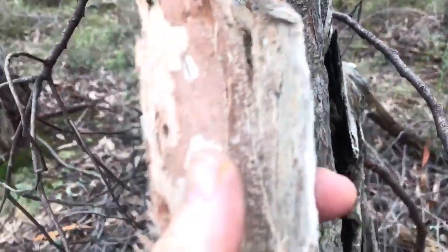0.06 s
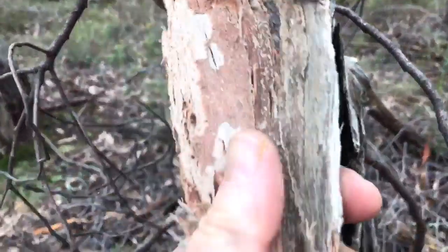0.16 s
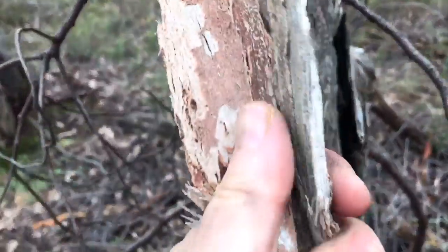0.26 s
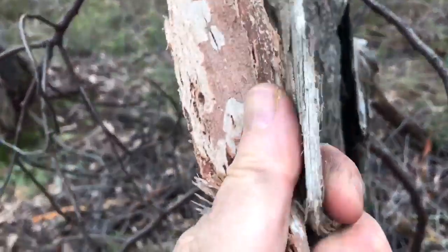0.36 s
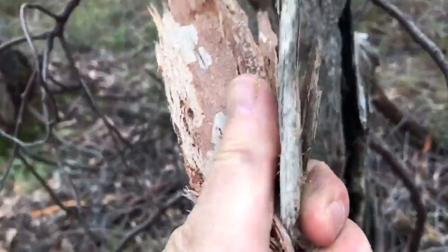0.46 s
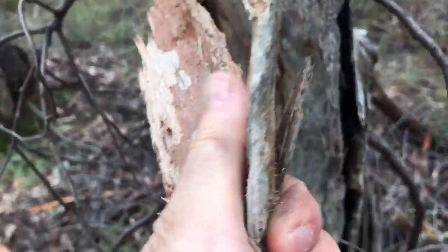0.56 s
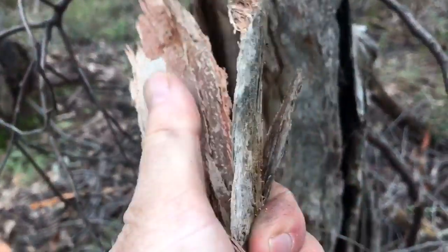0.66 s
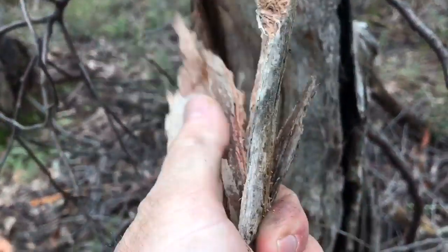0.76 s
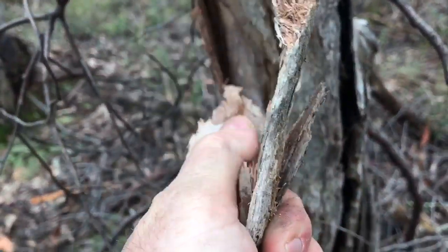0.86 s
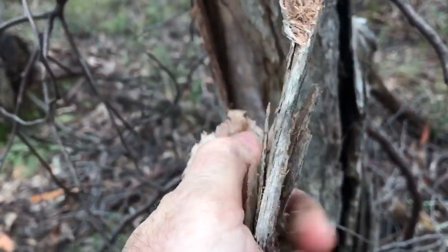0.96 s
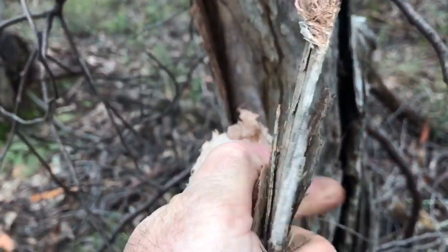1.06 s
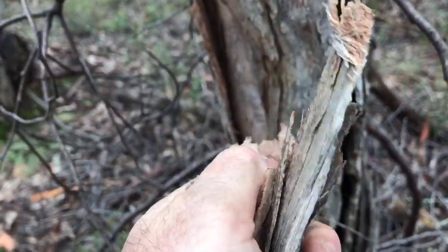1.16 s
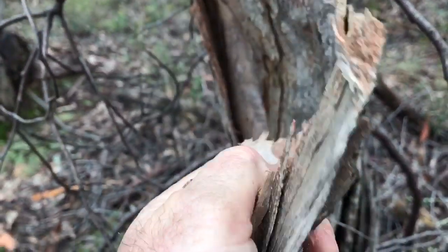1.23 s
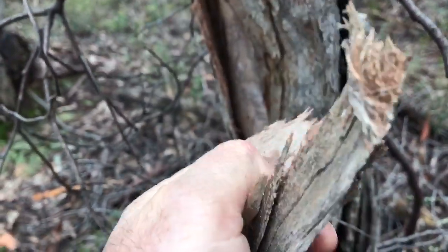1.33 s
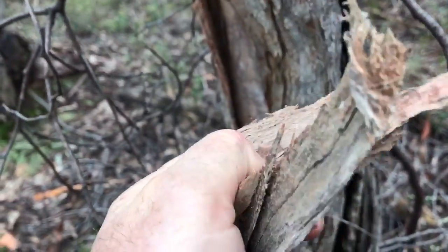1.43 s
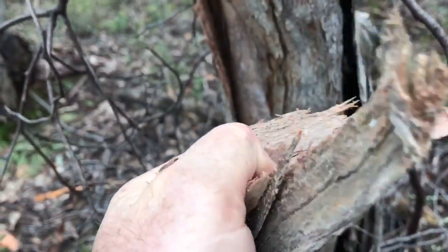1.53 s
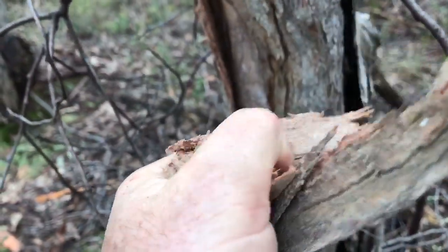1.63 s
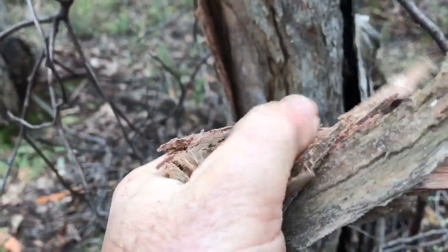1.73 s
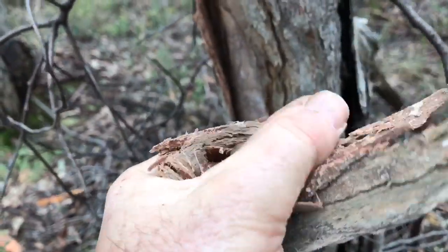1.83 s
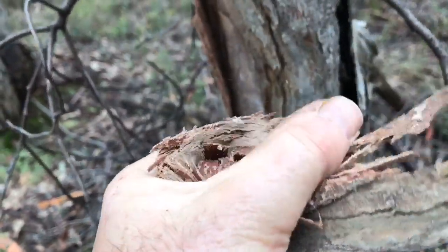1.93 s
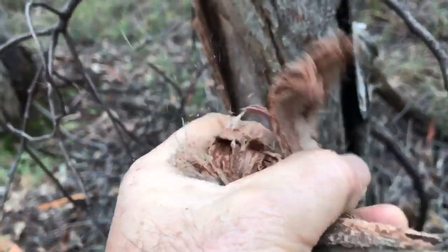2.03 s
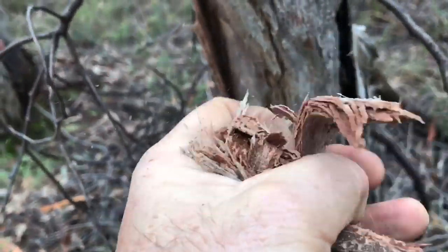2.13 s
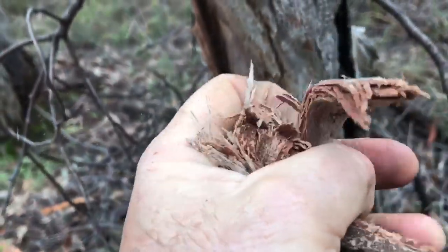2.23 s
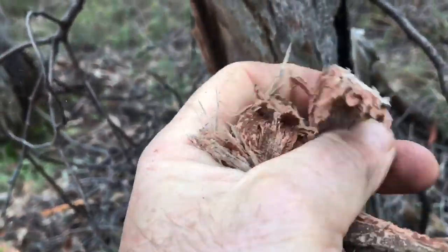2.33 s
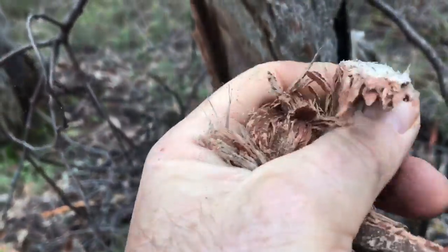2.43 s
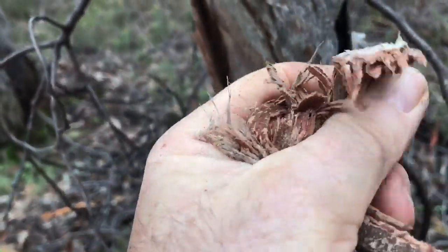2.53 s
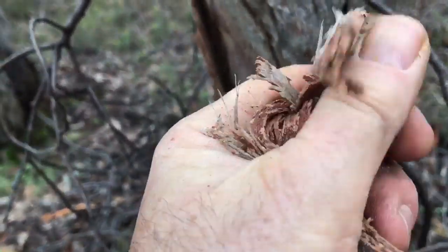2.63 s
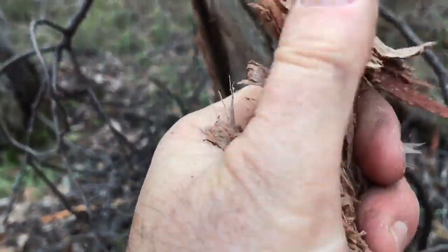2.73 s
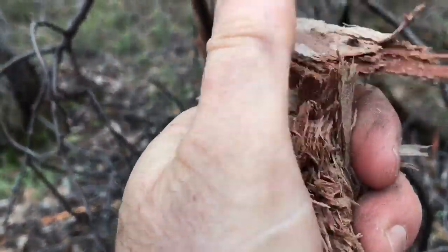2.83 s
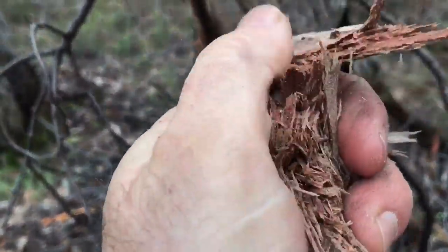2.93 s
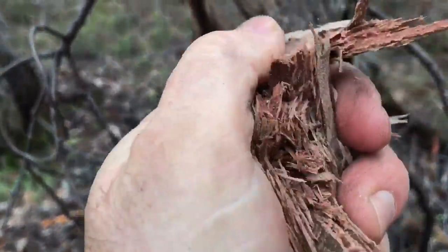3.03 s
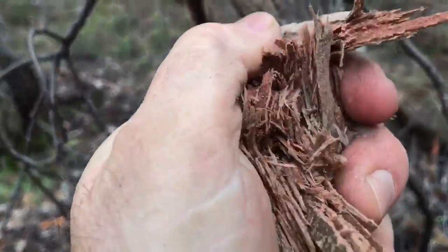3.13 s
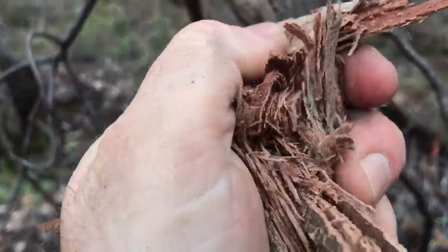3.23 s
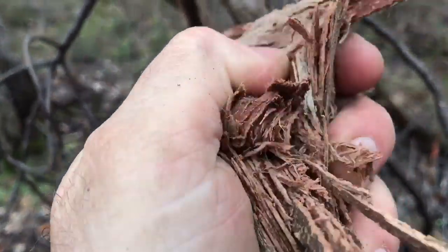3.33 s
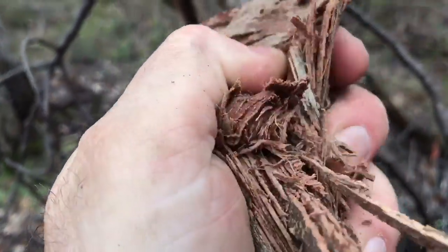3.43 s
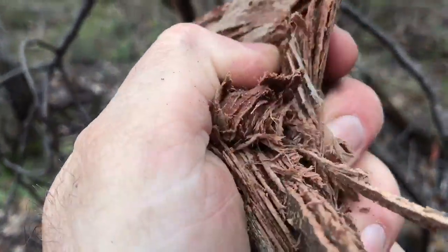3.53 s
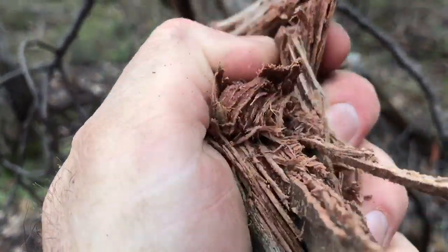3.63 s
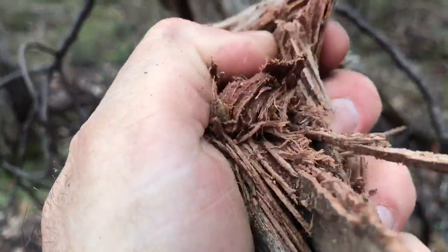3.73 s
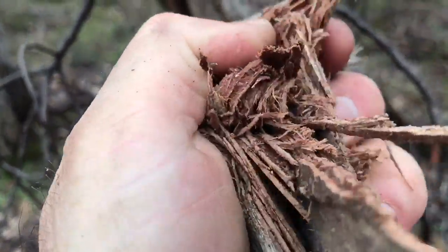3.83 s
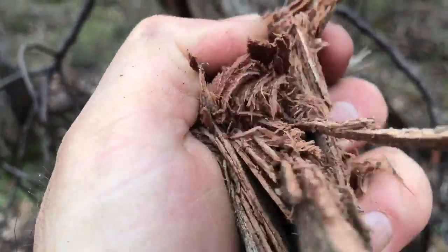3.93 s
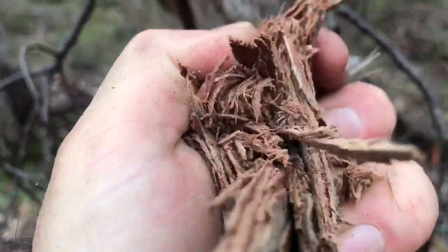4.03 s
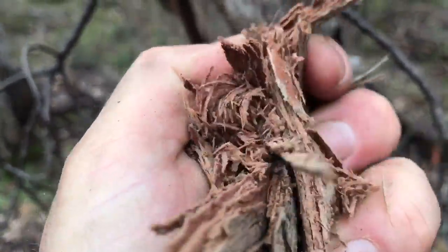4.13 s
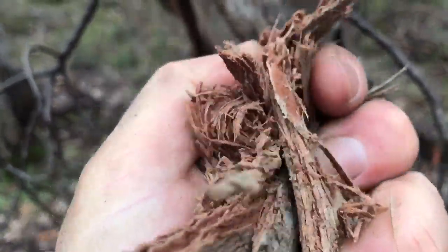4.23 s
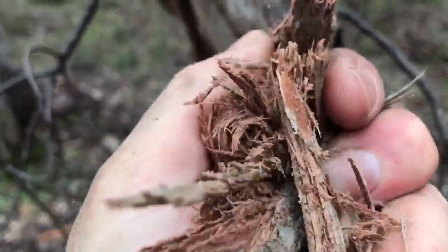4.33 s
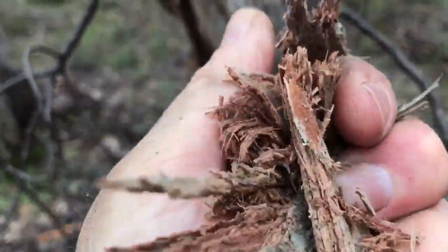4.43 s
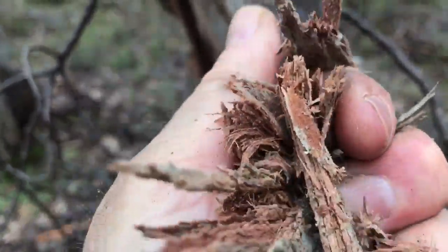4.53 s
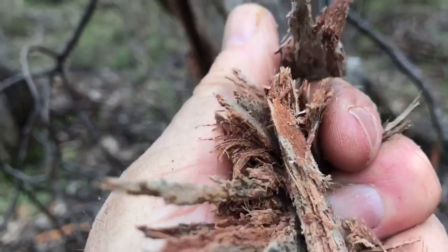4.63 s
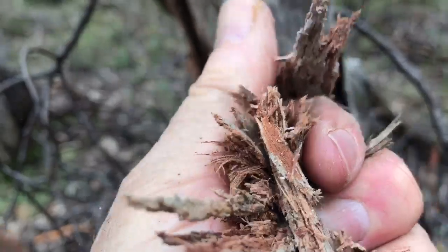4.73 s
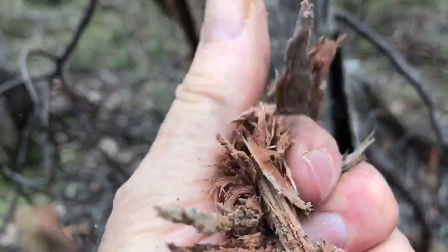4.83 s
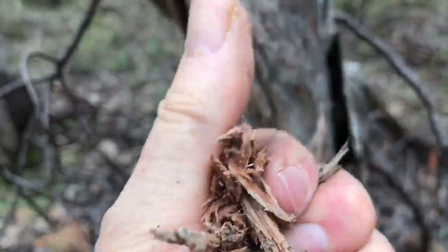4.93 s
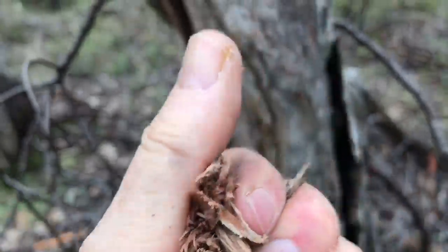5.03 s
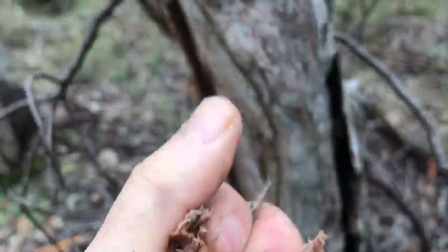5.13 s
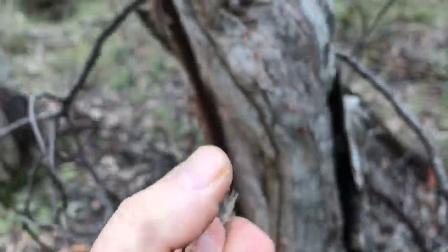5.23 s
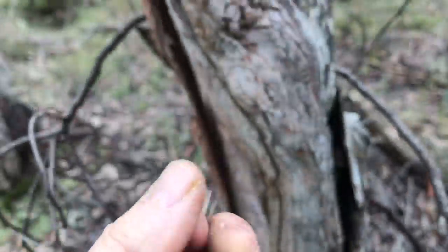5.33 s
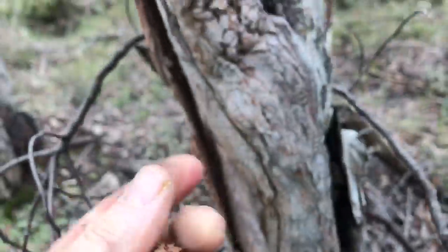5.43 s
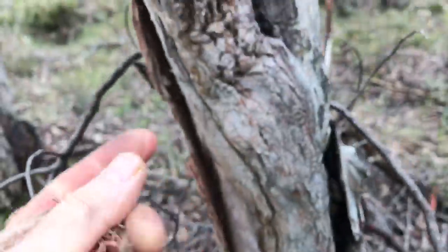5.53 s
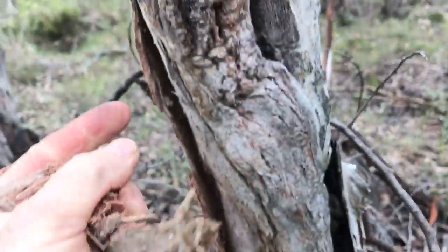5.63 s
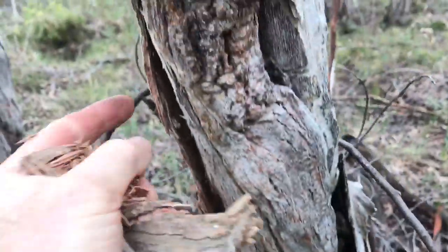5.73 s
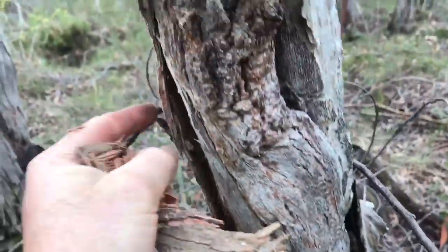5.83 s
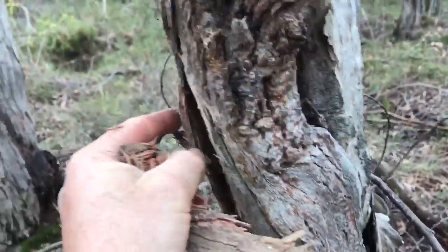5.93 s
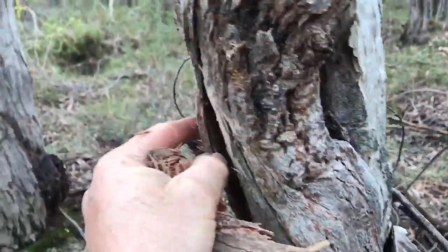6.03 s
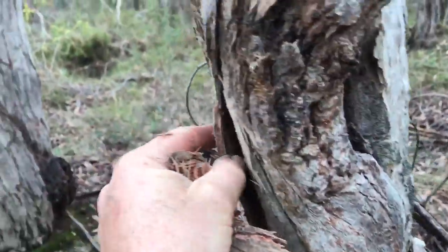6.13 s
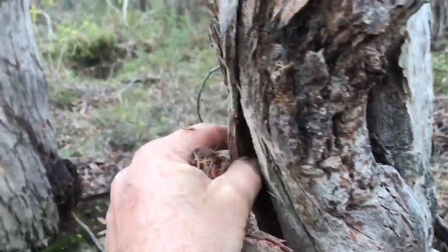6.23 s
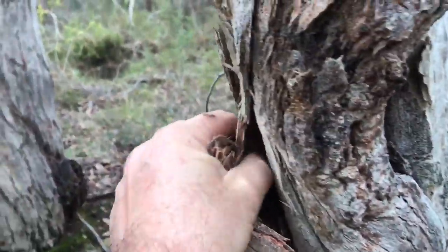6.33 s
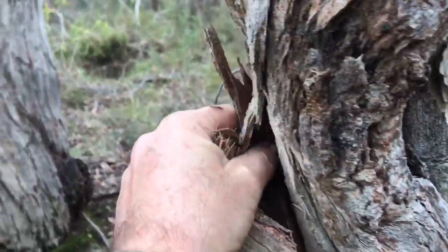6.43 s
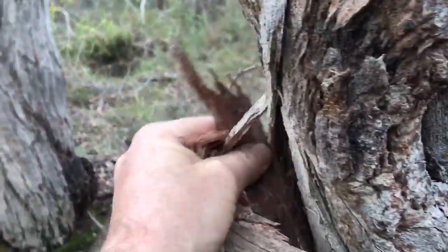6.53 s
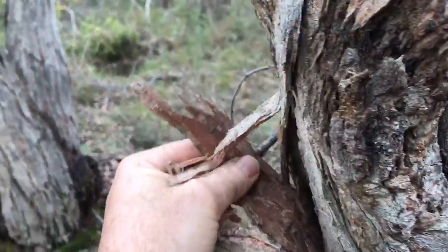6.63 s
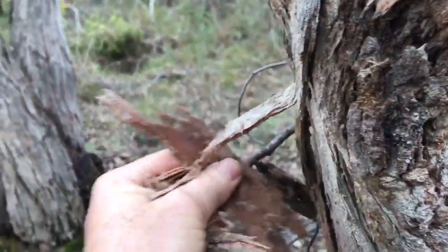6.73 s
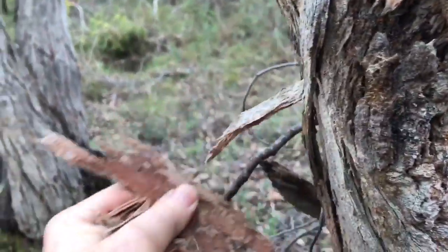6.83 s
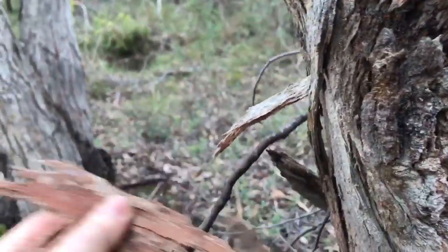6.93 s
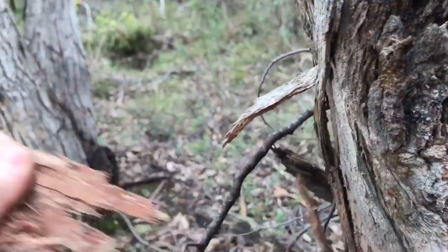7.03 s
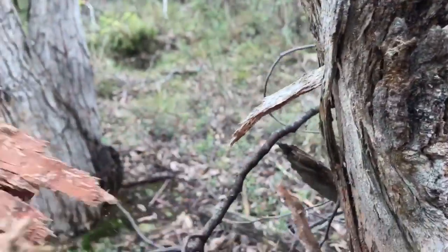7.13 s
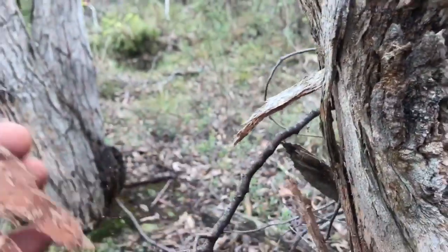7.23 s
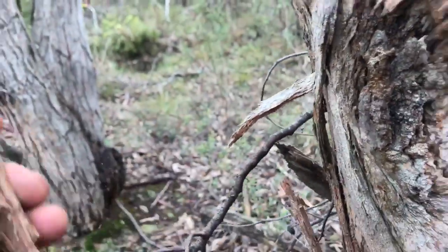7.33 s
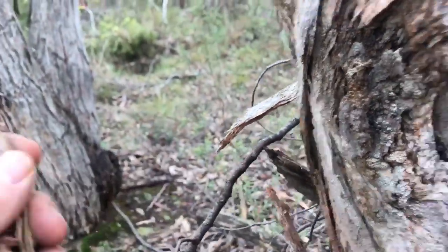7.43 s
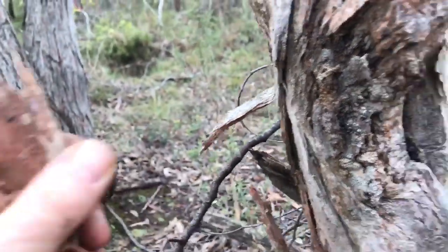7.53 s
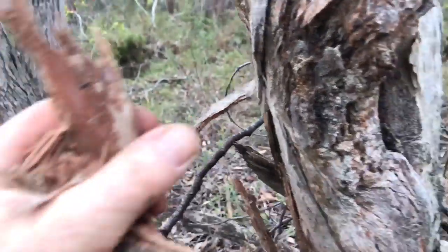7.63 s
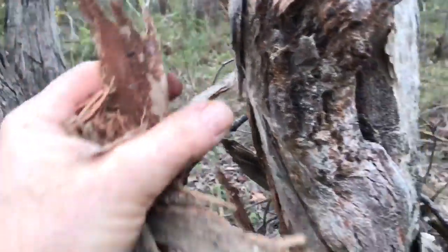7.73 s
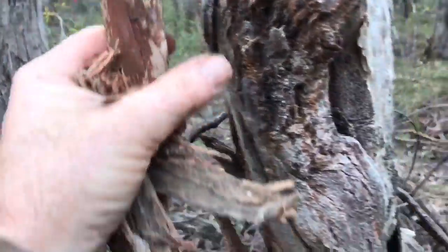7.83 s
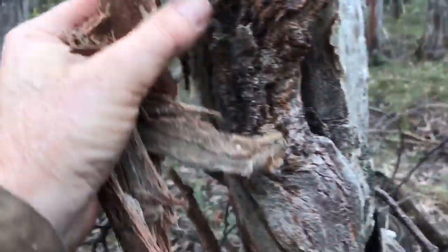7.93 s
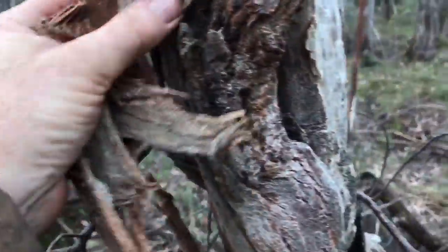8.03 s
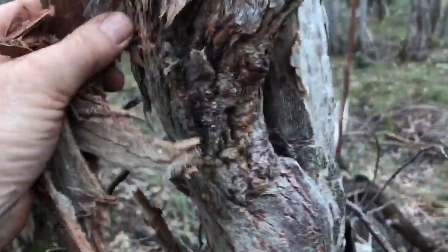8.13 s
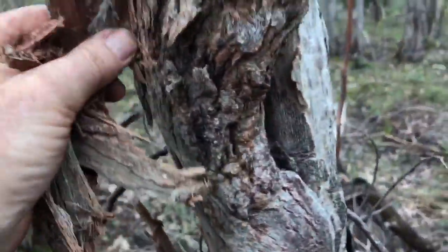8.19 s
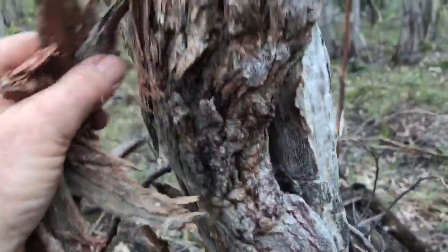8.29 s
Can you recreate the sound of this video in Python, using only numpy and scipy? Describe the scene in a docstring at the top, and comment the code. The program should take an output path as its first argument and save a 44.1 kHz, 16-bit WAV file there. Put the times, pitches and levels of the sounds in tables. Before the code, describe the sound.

Dry fibrous bark crackles, crunches and rips close up in a gripping hand, with sharp splinter snaps, then sparser tugs and dull woody bumps.

```python
"""Stripping dry bark

Quiet bushland, mono microphone close to a hand that bends, crushes and strips fibrous bark from a dead trunk.
Fibres break by the thousand: short bursts of filtered noise that follow the grip and flare with every tear.
Thicker splinters snap one by one, each a noisy crack with a falling ring; loose slabs give dull low bumps.
Far off, a rumble and a faint hiss of air are steady noise that wavers a little."""
import sys
import numpy as np
from scipy import signal
from scipy.io import wavfile

SR = 44100
rng = np.random.default_rng(int(sys.argv[2]) if len(sys.argv) > 2 else 0)


def inscribe(sig):
    """Save sig as 16-bit PCM at rate SR to the path in sys.argv[1].

    A 1-D sig is mono; a 2-D sig holds one channel per row.
    Samples are clipped to [-1, 1] before scaling.
    """
    pcm = np.round(np.clip(np.atleast_2d(sig).T, -1, 1) * 32767)
    wavfile.write(sys.argv[1], SR, pcm.astype(np.int16))


N = 368676      # samples

# The steady grip between tears:
# (time [s], crackle drive [dB], extra low body [dB], extra fine treble [dB])
STEADY_GRIP = [(0, -35.5, 0.5, 0), (0.74, -37, 1, -1), (0.785, -50.5, 26, -1), (0.98, -55, -12, 0),
               (1.3, -42.5, -8, -0.5), (1.7, -42.5, 4, -1.5), (2.0, -46.5, 4, 1.5), (2.3, -46.5, -6, 1),
               (2.6, -43.5, -5, 4), (2.85, -39.5, -8, -2), (2.95, -49.5, -5, 4.5), (3.14, -48.5, -15, 3.5),
               (3.3, -40.5, 10, 1), (3.5, -46.5, 8, 1), (4.1, -47.5, 6, -1.5), (4.45, -40.5, -10, -2),
               (4.7, -45.5, -6, 4), (4.95, -39, 6, -1), (5.5, -43.5, 4, 0), (5.76, -56, 24, -2),
               (6.25, -61, 26, 1), (6.6, -61, 0, -1), (6.75, -45, 1, 2), (6.88, -56.5, 17, -0.5),
               (7.5, -50, 21, -0.5), (7.9, -59, 1, -6.5), (8.36, -51.5, -3, 4.5)]
# Tears, each a flare of the crackle:
# (peak time [s], peak drive [dB], rise [s], fall [s], extra low body [dB])
TEAR_FLARES = [(0.07, -23, 0.058, 0.044, 2), (0.359, -31.5, 0.2, 0.033, 7), (0.499, -34, .05, 0.18, 13),
               (0.7, -33, 0.052, 0.039, 12), (0.873, -34, 0.058, 0.056, -6), (1.04, -40, 0.033, 0.062, 13),
               (1.192, -30, 0.088, 0.068, 2.5), (1.503, -30, 0.16, 0.038, -5),
               (1.589, -25, 0.015, 0.018, -1), (1.734, -29.5, 0.016, 0.04, 5.5),
               (1.87, -33.5, 0.15, 0.095, -2), (2.098, -27.5, .055, 0.076, 2),
               (2.285, -39, 0.052, 0.019, -11), (2.405, -37.5, .09, 0.53, 0),
               (2.759, -29.5, 0.093, 0.05, -13), (2.868, -35.5, 0.054, .05, 13),
               (3.083, -45, 0.034, 0.039, -12), (3.173, -35.5, 0.027, .08, -1), (3.273, -34, .07, 0.025, 0),
               (3.337, -34.5, 0.042, 0.067, 7), (3.394, -27.5, 0.024, 0.047, 3.5),
               (3.717, -39.5, 0.17, 0.067, 1.5), (3.891, -32, 0.078, 0.055, 6.5),
               (4.345, -38.5, 0.19, 0.088, 11), (4.595, -37, 0.29, 0.05, 0),
               (5.123, -43.5, 0.24, 0.035, 25), (5.288, -39.5, 0.064, 0.033, -5),
               (5.378, -35, 0.042, .045, 5), (6.04, -48.5, 0.027, 0.2, 21.5),
               (6.475, -39, 0.16, 0.056, 21.5), (6.581, -35.5, 0.038, 0.32, 16),
               (6.77, -39, 0.02, 0.073, 19), (6.992, -27.5, 0.041, 0.016, 2), (7.195, -41.5, 0.18, .035, 9),
               (7.259, -35.5, 0.0089, 0.0073, 4), (7.363, -35.5, 0.022, 0.038, 2),
               (7.518, -34.5, 0.041, 0.018, -5), (7.842, -53, 0.038, 0.038, 4),
               (8.066, -40, 0.014, 0.035, 24), (8.213, -23, 0.026, 0.016, 11),
               (8.36, -41.5, 0.033, .05, 29)]
TEAR_SPAN_DB = 10       # change of drive over one rise or one fall


def pull():
    """Grip and tears add in power; each brings its own low body in proportion."""
    grip_db, grip_body_db, fine_db = in_time(STEADY_GRIP)
    t = np.arange(N) / SR
    power = from_db(2 * grip_db)        # twice the decibels as gain is power
    weighted_body = power * grip_body_db
    for peak_s, peak_db, rise_s, fall_s, tear_body_db in TEAR_FLARES:
        away = np.where(t < peak_s, (peak_s - t) / rise_s, (t - peak_s) / fall_s)
        flare = from_db(2 * (peak_db - TEAR_SPAN_DB * away))
        power = power + flare
        weighted_body = weighted_body + flare * tear_body_db
    return 10 * np.log10(power), weighted_body / power, fine_db


BREAKS_PER_S = 1000     # before the pull and the clumping change it
SIZE_SPREAD_DB, BREAK_T60_S = 6, 0.0025


def breaks(rush, clump_db):
    """Energy of fibres that part at random, in clumps: bursts of a few milliseconds over a fine rustle; mean 1."""
    born = rng.random(N) < BREAKS_PER_S * rush * from_db(clump_db) / SR
    size_db = SIZE_SPREAD_DB * np.minimum(rng.exponential(1, N), 3.0)
    energy = born * from_db(size_db) ** 2 / rush
    fade = from_db(-120 / (BREAK_T60_S * SR))       # an energy ratio, so 120 here is a 60 dB fall
    bursts = signal.lfilter([1], [1, -fade], energy + 0.062)
    return bursts / bursts.mean()


# Colour of breaking fibre heard up close: (frequency [Hz], level [dB per Hz])
FIBRE_COLOUR = [(180, -12), (350, -16), (700, -10), (1200, -5), (2000, -5), (3200, -1), (4400, -3),
                (6200, -3), (9000, -4.5), (13000, -6.5), (17000, -9)]


def crackle(crackle_db, body_db, fine_db):
    """Most breaks sound in all bands; coarse, middling and fine fibres add breaks of their own range."""
    rush = from_db(0.6 * (crackle_db + 42))     # a harder pull parts more fibres a second
    clump_db = 3.6 * drift(30.0)
    broad = breaks(rush, clump_db)
    white = rng.standard_normal((2, N))         # neighbouring bands get unrelated noise
    coarse, middling, fine = [np.sqrt(broad + 0.55 * breaks(rush, clump_db)) * white for _ in range(3)]
    out = np.zeros(N)
    for k, (hz, band) in enumerate(half_octaves(155)):
        fibres = fine if hz > 7000 else middling if hz > 2000 else coarse
        body_share = np.clip(np.log2(2800 / hz) / 3.4, 0, 1)
        fine_share = np.clip(np.log2(hz / 6000), 0, 1)
        colour_db = at_hz(FIBRE_COLOUR, hz) + body_share * body_db + fine_share * fine_db
        out += from_db(colour_db) * signal.sosfilt(band, fibres[k % 2])
    return from_db(crackle_db) * out


# Splinters that stand out, loud ones and quieter ones heard alone, with some low woody knocks:
# (time [s], drive before the ring's strength scales it [dB],
# nominal ring [Hz], power share of broad crack [0-1], crack centre [Hz], decay scale [s])
DISTINCT_SPLINTERS = [(0.0341, -18.5, 1850, 0.3, 5400, 0.006), (0.045, -18.5, 3010, 0.4, 5200, 0.012),
                      (0.052, -25, 2950, .8, 7500, .0083), (0.068, -14, 3270, 0.3, 5600, 0.0086),
                      (0.0727, -10.5, 3280, .5, 4500, 0.0065), (0.0839, -14.5, 1830, 0.53, 7700, 0.0083),
                      (0.0933, -15, 2670, .5, 5300, 0.0066), (0.0972, -10.5, 8360, 0.8, 6000, 0.0093),
                      (0.1132, -15, 2850, .5, 4500, 0.0088), (0.1174, -15, 6120, .6, 6800, 0.0045),
                      (0.1808, -15.5, 2900, 0.35, 7300, 0.0062), (0.1887, -15, 3140, .64, 4560, 0.0061),
                      (0.217, -17.5, 2930, .5, 7200, 0.0039), (0.2604, -17, 3160, 0.4, 8100, .004),
                      (0.2826, -21, 3220, 0.4, 6600, .0073), (0.294, -19, 6160, 0.6, 5800, .0061),
                      (0.3063, -12.5, 2960, 0.47, 6900, 0.0061), (0.3393, -11, 3360, 0.6, 5100, 0.0049),
                      (0.3511, -21, 14200, .7, 4900, .0097), (0.361, -16, 4440, .8, 8100, .0072),
                      (0.4128, -21, 5000, .8, 5600, .006), (0.4308, -24, 6330, .7, 7300, .0067),
                      (0.5305, -32, 3280, .5, 3800, .0069), (0.591, -26, 8350, .7, 7700, 0.0065),
                      (0.6126, -22, 6940, 1, 7600, .01), (0.6722, -34, 3830, .7, 6700, .005),
                      (0.8589, -14.5, 4350, 0.5, 6300, .0015), (0.8817, -19, 6420, 0.7, 10400, 0.0026),
                      (0.967, -17, 12400, .6, 6750, 0.002), (1.0, -23, 8830, .5, 8200, .003),
                      (1.004, -25.5, 2800, .57, 7900, .013), (1.0306, -24.5, 3320, 0.85, 7900, .0083),
                      (1.0436, -27, 3450, 1, 3500, 0.0094), (1.132, -27, 2710, .76, 5000, .0053),
                      (1.143, -19, 6370, .5, 9800, 0.005), (1.26, -15, 3080, 0.75, 8050, 0.014),
                      (1.2927, -22, 13220, 0.3, 4500, .0026), (1.3949, -20, 6290, .6, 8600, .0034),
                      (1.4, -18.5, 4180, 0.94, 4970, 0.0096), (1.4728, -18, 5470, .6, 6200, .0022),
                      (1.503, -17, 5600, .9, 7300, 0.0099), (1.5654, -19.5, 6100, 0, 8000, .0066),
                      (1.5986, -17, 4030, 0.5, 5800, .0034), (1.635, -17, 6060, 0.27, 10000, .0058),
                      (1.7156, -17, 4070, 0.3, 7800, .0041), (1.885, -23, 5860, 0.7, 8000, .0043),
                      (1.8934, -26, 1820, .8, 5500, 0.0098), (1.9139, -19.5, 5700, .5, 6600, 0.0058),
                      (1.9218, -21.5, 3050, .9, 5700, 0.0062), (1.9324, -22, 5250, 0.96, 7600, .0036),
                      (2.0197, -23, 12960, 0.1, 5300, 0.0029), (2.056, -25, 8700, 0.5, 6300, 0.011),
                      (2.0879, -15, 3320, 0.94, 8800, 0.01), (2.109, -20, 2970, .8, 7600, .0039),
                      (2.1619, -18, 3530, .7, 7400, 0.0045), (2.1854, -14, 5400, 0.7, 5070, 0.0032),
                      (2.4055, -19.5, 2870, 0.74, 5300, 0.013), (2.4247, -26, 11330, .3, 5200, .0036),
                      (2.4633, -14.5, 4170, 0.86, 3800, 0.0058), (2.4948, -18, 4570, 0.85, 10000, 0.0034),
                      (2.5283, -17.5, 3600, 0.7, 8500, 0.0064), (2.5405, -23, 13820, .5, 5300, .0034),
                      (2.5502, -18.5, 5800, 0.4, 9900, 0.0041), (2.5797, -24, 1660, 0.7, 6000, 0.0075),
                      (2.6543, -17.5, 14600, 0.7, 6600, .0049), (2.6631, -15, 5990, 0.88, 3250, 0.0026),
                      (2.744, -15, 9650, 0.2, 9000, .0065), (2.7578, -9, 11900, 0.5, 6300, 0.0043),
                      (2.7827, -19, 5900, 0.6, 7000, 0.0061), (2.924, -12, 1580, 0.1, 2330, 0.0027),
                      (2.9687, -24, 12020, .3, 7300, 0.0022), (2.9887, -25, 8790, .5, 10800, .003),
                      (3.0046, -26, 6000, .8, 4800, .005), (3.0814, -25, 7020, .5, 6400, 0.0038),
                      (3.143, -26, 4560, .3, 6900, 0.0083), (3.1672, -20.5, 8560, .7, 9100, 0.0052),
                      (3.2033, -21.5, 7960, 0.7, 5500, 0.0055), (3.228, -23, 14210, .5, 6500, .0027),
                      (3.242, -18, 4010, 0.8, 6700, .0031), (3.2559, -27, 2540, 0.9, 7900, .0026),
                      (3.2744, -24, 9090, .4, 5800, 0.0045), (3.312, -28, 1700, .2, 4000, 0.013),
                      (3.417, -16, 14640, 0.1, 6400, 0.0024), (3.763, -23, 11400, .3, 5900, .0039),
                      (3.7805, -19.5, 1650, .85, 9100, 0.0037), (3.8834, -22.5, 1470, 0.2, 5500, 0.012),
                      (4.0157, -17.5, 14900, 0.57, 5700, 0.0049), (4.133, -21, 3300, .6, 3360, 0.003),
                      (4.2133, -21, 6650, 0.95, 6370, 0.0046), (4.3523, -17, 7350, 1, 5370, .0057),
                      (4.3676, -23, 3540, 0.5, 8600, .0073), (4.3845, -21, 3600, .4, 7200, 0.0089),
                      (4.471, -22, 4220, 1, 4400, 0.0052), (4.4871, -7, 4300, 0.3, 5100, 0.0023),
                      (4.5194, -20.5, 5640, 0, 4400, .0062), (4.5339, -6.5, 6000, 0.56, 3600, 0.0042),
                      (4.543, -20, 3840, 0.3, 7200, 0.0037), (4.582, -27, 3800, .5, 6500, .0053),
                      (4.638, -26, 3790, .5, 6500, .007), (4.6512, -17.5, 9000, .7, 7600, 0.0055),
                      (4.7051, -17, 7600, .3, 7500, 0.0029), (4.7293, -18, 6000, 0.74, 10500, 0.0023),
                      (4.7421, -16, 4330, 1, 8200, .003), (4.781, -28, 13870, 0.4, 5500, .0022),
                      (4.7969, -27, 14510, .5, 6300, .0039), (4.8433, -17, 14600, 0.33, 6300, 0.0034),
                      (4.8785, -28, 14200, .3, 6800, 0.0084), (5.0512, -24, 11240, 0.8, 6600, 0.0045),
                      (5.2622, -28, 2870, 0.3, 6400, 0.011), (5.2095, -32, 3700, .3, 5200, .0064),
                      (5.2272, -34, 3100, .2, 5100, 0.0098), (5.3985, -31, 5700, .7, 4500, .004),
                      (5.579, -35, 2820, .7, 5300, .009), (5.682, -30.5, 4300, 0.17, 6500, 0.0164),
                      (6.2914, -30, 7900, .4, 4100, 0.0076), (6.344, -35, 1190, 0, 3000, 0.011),
                      (6.397, -28, 8570, 0.3, 7600, .0049), (6.438, -30, 1200, 0.9, 3500, 0.012),
                      (6.476, -30.5, 3840, 0.3, 4000, 0.013), (6.585, -34, 1500, .4, 3500, .012),
                      (6.641, -33, 1090, .3, 3480, 0.016), (6.6596, -22, 3800, 0.9, 5200, 0.0041),
                      (6.767, -20, 5370, .8, 4000, 0.0046), (6.7883, -22.5, 1870, 0.84, 6000, 0.02),
                      (6.8035, -20, 2760, 0.9, 2600, 0.013), (6.8407, -24, 13090, 0.2, 4700, 0.0025),
                      (6.877, -36, 1290, .2, 3500, 0.012), (6.965, -21.5, 1220, 0.55, 6700, 0.01),
                      (6.971, -24, 1160, .74, 6500, 0.0082), (6.9885, -20.5, 6240, 0.8, 4200, 0.0094),
                      (7.166, -19, 1730, 0.08, 3100, 0.0077), (7.2583, -29, 3100, .6, 5100, .0056),
                      (7.262, -28, 3340, 0.8, 6200, 0.0092), (7.289, -33, 5400, 0.7, 4700, 0.015),
                      (7.324, -30, 2710, 0.7, 5370, 0.016), (7.3629, -21.5, 11000, 0.65, 6000, 0.014),
                      (7.4836, -27, 6930, 0.3, 4700, .0061), (7.6925, -41, 13900, 0.5, 6200, 0.013),
                      (8.062, -24, 1010, 0.27, 3180, 0.0089), (8.1005, -30, 8700, 0.3, 5200, 0.014),
                      (8.139, -30.5, 8700, 0.6, 5700, 0.016), (8.1975, -24, 1460, .6, 3500, 0.0082),
                      (8.2127, -25, 5850, 0, 3500, .01), (8.217, -20, 6600, 0.7, 5300, .009),
                      (8.337, -32, 10800, 0.1, 5000, 0.0096)]


def snaps(splinters):
    """A broad crack and a rough ring that sweeps down: bending waves bring the highs first."""
    out, t = np.zeros(N), np.arange(600) / SR
    noise = rng.standard_normal((len(splinters), 2, len(t)))
    noise[:, 0, 0] = 3.2        # the crack opens with one sharp step
    for (start_s, drive_db, ring_hz, share, crack_hz, decay_s), (hiss, rattle) in zip(splinters, noise):
        age = t / decay_s
        # the pitch falls from about 1.42 to 0.75 of the nominal ring
        cycles = ring_hz * (0.748 * t + 0.065 * decay_s * (1 - np.exp(-age / 0.097)))
        swell = np.sqrt(age / 0.05) * np.exp(-age / 0.076) * 1.44
        ring = np.sin(2 * np.pi * cycles) * (1 + 0.28 * rattle) * swell
        crack = around(hiss * from_db(-90 * age), crack_hz, 2.45)
        crack = around(crack, crack_hz, 2.45)       # twice, for steeper sides
        both = rms_one(np.sqrt(1 - share) * rms_one(ring) + np.sqrt(share) * crack)
        add(out, start_s, from_db(drive_db) * np.std(ring) * both)
    # small pieces radiate little bass
    return signal.sosfilt(signal.butter(2, 750, "high", fs=SR, output="sos"), out)


TICKS_PER_S = 75
TICK_DB, TICK_SPREAD_DB = -34.5, 4.5        # least drive at a middling pull, random spread above it
TICK_FOLLOWS = 0.88                         # share of the pull's swing in dB
TICK_LOW_HZ, TICK_HIGH_HZ = 2150, 15540     # range of nominal rings
TICK_DECAY_S = 0.0042                       # decay scale at the lowest ring
TICK_SHARE, TICK_CRACK_HZ = 0.53, 6400      # power share and centre of the crack


def ticks(crackle_db):
    """Rows for small splinters: at random times, louder with the pull, shorter the higher they ring."""
    place, pitch, size = rng.random((3, int(TICKS_PER_S * N / SR)))
    hz = TICK_LOW_HZ * (TICK_HIGH_HZ / TICK_LOW_HZ) ** pitch
    at = (place * (N - 1)).astype(int)
    pull_db = TICK_FOLLOWS * (crackle_db[at] + 38)
    drive_db = TICK_DB + pull_db - TICK_SPREAD_DB * np.log(1 - size) / 2
    share, crack_hz = np.full_like(hz, TICK_SHARE), np.full_like(hz, TICK_CRACK_HZ)
    decay_s = TICK_DECAY_S * np.sqrt(TICK_LOW_HZ / hz)
    return np.c_[at / SR, drive_db, hz, share, crack_hz, decay_s]


# Dull bumps as slabs come loose or knock the trunk:
# (time [s], level before swell and decay [dB], centre [Hz], 60 dB decay [s])
SLAB_BUMPS = [(5.427, -38.5, 91.5, 0.05), (6.288, -34.5, 524, 0.024), (6.37, -38, 284, 0.051),
              (6.577, -39.5, 258, 0.065), (6.799, -31, 145, 0.075), (6.966, -32.5, 524, 0.072),
              (7.008, -39, 91, 0.081), (8.066, -40, 129, 0.047), (8.1, -33, 262, 0.037),
              (8.222, -36, 91, 0.091)]


def bumps():
    """A dull knock: low noise that swells for a few milliseconds and dies."""
    out, t = np.zeros(N), np.arange(6000) / SR
    swell = 1 - np.exp(-t / 0.0022)
    noise = rng.standard_normal((len(SLAB_BUMPS), len(t)))
    for (start_s, level_db, hz, t60_s), thud in zip(SLAB_BUMPS, noise):
        thud = around(around(thud, hz, 2.3), hz, 2.3)
        add(out, start_s, from_db(level_db - 60 * t / t60_s) * swell * thud)
    return out


# The bush at rest, far off: (frequency [Hz], relative level [dB per Hz])
BUSH_COLOUR = [(22, -46), (36, -11.5), (62, 3), (100, -6.5), (200, -10), (320, -12), (600, -21),
               (1200, -26), (2600, -26.5), (5000, -33), (15500, -39)]
BUSH_DB = -50       # rms level
# Swell of the rumble, in bands centred under 100 Hz: (time [s], relative level [dB])
RUMBLE_SWELL = [(0, 0.5), (6.35, -1), (6.6, 0.5), (7.05, 4.5), (7.25, -2), (8.36, -1)]


def bush():
    """Smooth far rumble and air: noise that wavers a little in each band."""
    white, out = rng.standard_normal((2, N + SR)), np.zeros(N)
    (swell_db,) = in_time(RUMBLE_SWELL)
    for k, (hz, band) in enumerate(half_octaves(22)):
        level_db = at_hz(BUSH_COLOUR, hz) + 0.51 * drift(8.2) + swell_db * (hz < 100)
        settled = signal.sosfilt(band, white[k % 2])[SR:]       # drop the filter's first second
        out += from_db(level_db) * settled
    return from_db(BUSH_DB) * rms_one(out)


def from_db(db):
    """Decibels to gain."""
    return 10 ** (np.asarray(db) / 20)


def rms_one(x):
    """Scale to rms 1."""
    return x / np.sqrt(np.mean(x ** 2) + 1e-20)


def in_time(rows):
    """Columns of a curve table, one value a sample."""
    s, *columns = np.transpose(rows)
    return [np.interp(np.arange(N) / SR, s, c) for c in columns]


def at_hz(points, hz):
    """Read a spectrum on a log-frequency axis."""
    point_hz, level_db = np.transpose(points)
    return np.interp(np.log(hz), np.log(point_hz), level_db)


def drift(rate_hz):
    """Slow random wander, rms 1: noise smoothed by two poles at rate_hz, drawn every 40 samples."""
    r = np.exp(-80 * np.pi * rate_hz / SR)
    slow = signal.lfilter([1], [1, -2 * r, r * r], rng.standard_normal(N // 40 + 2002))[2000:]
    return np.interp(np.arange(N) / 40, np.arange(len(slow)), rms_one(slow))


def half_octaves(lowest_hz):
    """Centres and band-pass filters, half an octave each, from lowest_hz to below 20 kHz."""
    edges = lowest_hz * 2 ** np.arange(0, np.log2(20000 / lowest_hz), 0.5)
    return [(np.sqrt(low * high), signal.butter(2, [low, high], "band", fs=SR, output="sos"))
            for low, high in zip(edges, edges[1:])]


def around(noise, hz, ratio):
    """Noise kept mainly between hz / ratio and hz * ratio, rms 1."""
    edges = np.clip([hz / ratio, hz * ratio], 30, 20000)
    return rms_one(signal.lfilter(*signal.butter(1, edges, "band", fs=SR), noise))


def add(out, s, sound):
    """Mix a short sound in at s seconds."""
    i = round(s * SR)
    out[i:i + len(sound)] += sound[:N - i]


def scene():
    """One close microphone, open air, no walls."""
    crackle_db, body_db, fine_db = pull()
    splinters = np.r_[np.array(DISTINCT_SPLINTERS), ticks(crackle_db)]
    return (crackle(crackle_db, body_db, fine_db) + snaps(splinters) + bumps() + bush())[None]


# Dips in the microphone's response: (centre [Hz], width [Hz], depth as a share of amplitude [0-1])
HOUSING_DIPS = [(4950, 440, 0.3), (7570, 1240, 0.31), (10410, 1070, 0.4)]
CUTOFF_HZ = 15800


def record(dry):
    """The microphone's housing takes three bites out of the treble; a steep low-pass cuts the top."""
    for hz, width_hz, depth in HOUSING_DIPS:
        b, a = signal.iirpeak(hz, hz / width_hz, fs=SR)
        dry = dry - depth * signal.lfilter(b, a, dry)
    return signal.sosfilt(signal.ellip(10, 0.5, 70, CUTOFF_HZ, fs=SR, output="sos"), dry)


dry = scene()
out = record(dry)
inscribe(out)
```